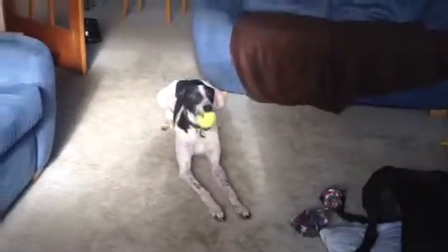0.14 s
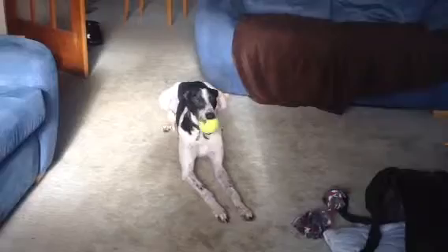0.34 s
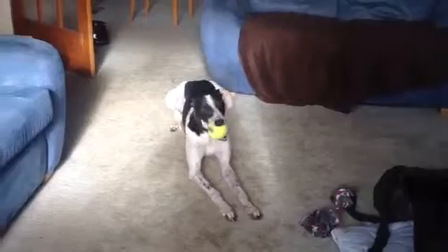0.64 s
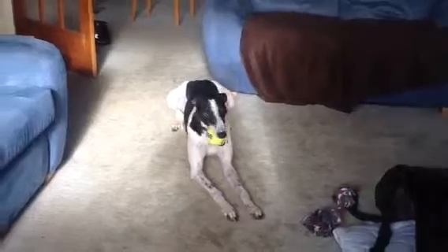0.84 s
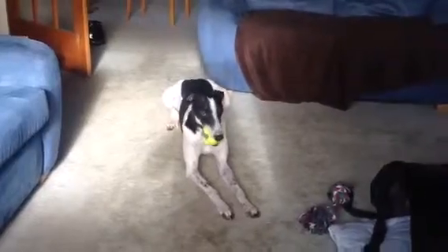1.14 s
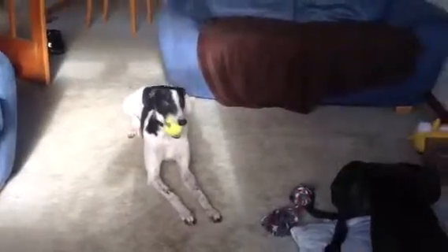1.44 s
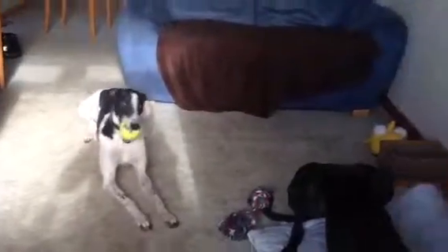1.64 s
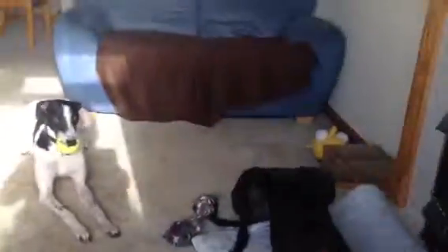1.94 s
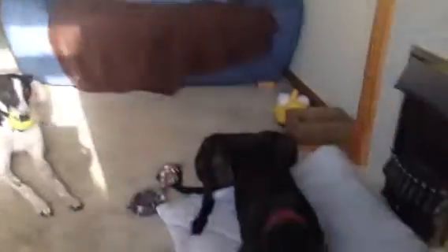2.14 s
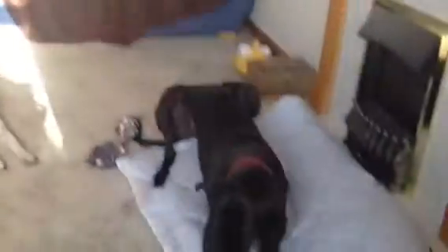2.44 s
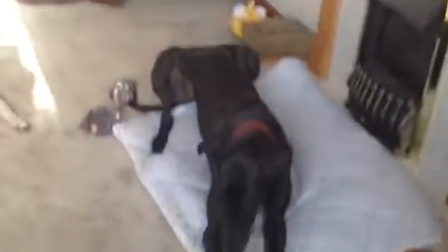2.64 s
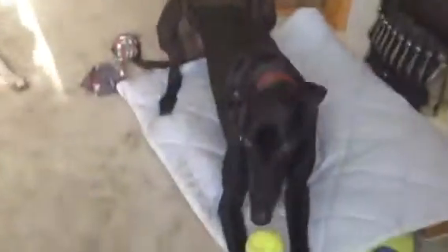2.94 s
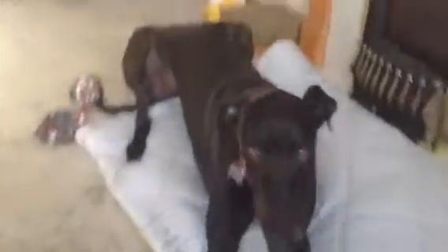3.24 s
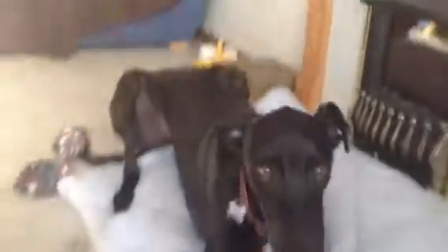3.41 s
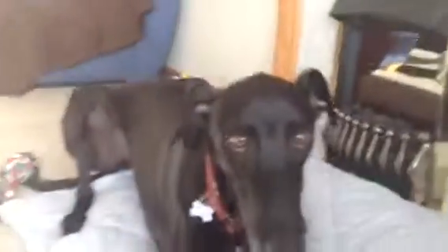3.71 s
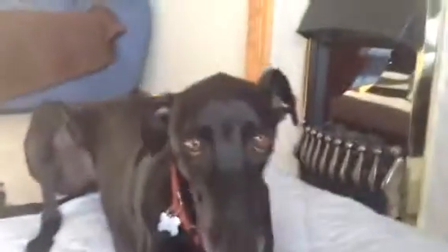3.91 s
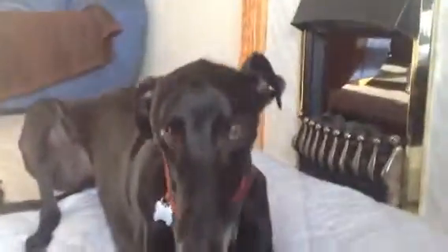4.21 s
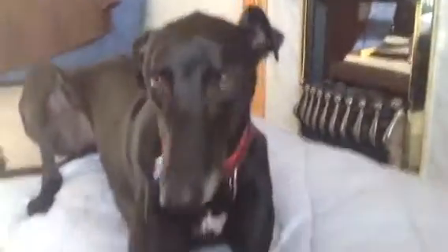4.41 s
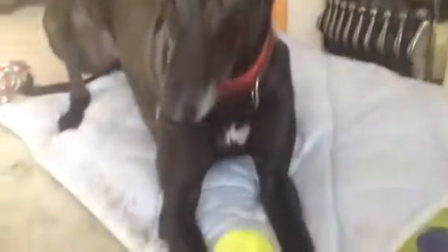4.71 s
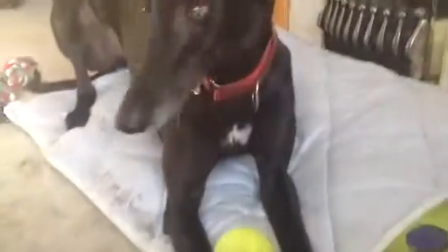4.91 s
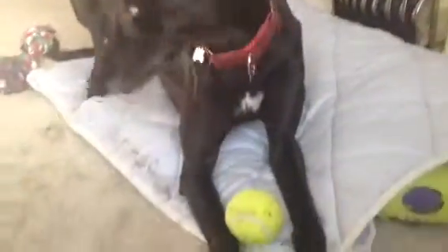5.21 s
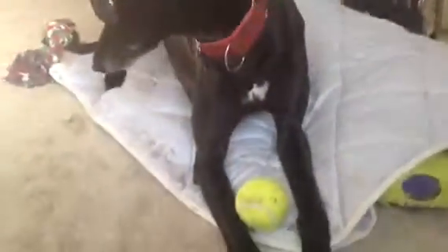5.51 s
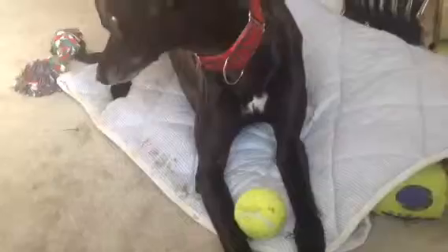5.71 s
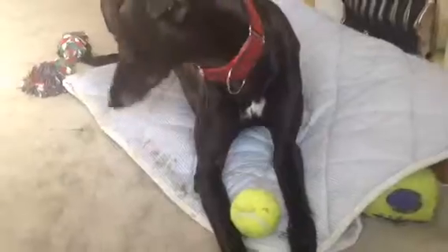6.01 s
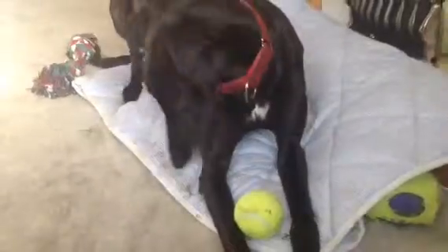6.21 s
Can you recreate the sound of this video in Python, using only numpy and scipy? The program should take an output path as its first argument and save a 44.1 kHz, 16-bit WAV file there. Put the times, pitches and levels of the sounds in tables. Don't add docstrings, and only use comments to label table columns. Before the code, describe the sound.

A small carpeted room with soft hum and faint microphone hiss; the tail of an earlier squeak dies away at the start. At 0.4 s a dog's bite makes a short falling yelp from a rubber ball, with a brief answering squeak as it refills. At 1.0 s a strong rising squeak is followed by a long, uneven, slightly croaky swell until 1.35. A quick rising pair comes at 1.95, softer. A sharp handling knock at 2.7 leads into cloth scuffs as another dog shifts on a quilt, fading by 3.5. A faint low squeak and falling reply come at 3.5. Dry ticks cluster around 4.0 to 4.3. At 4.76 a squeak dips and climbs, then a long wavering refill lasts to 5.2. Dull bumps and rubs on the casing crowd 5.1 to 6.2, before the hardest, highest squeak at 6.2 to 6.3.

```python
import sys
import numpy as np
from scipy import signal
from scipy.fft import rfft, irfft
from scipy.io import wavfile

SR = 44100
rng = np.random.default_rng(int(sys.argv[2]) if len(sys.argv) > 2 else 0)


def ratio(d):
    e = np.asarray(d, float) / 20
    return 10 ** e


def pcm_store(signal):
    levels = np.round(np.clip(np.atleast_2d(signal), -1, 1) * 32767)
    wavfile.write(sys.argv[1], SR, levels.astype(np.int16).T)


N = 280035
RUN_IN = SR // 4

# start_s, pitch_hz, level_db
SQUEEZE_NOTES = [
    [(0.397, 1678, -32), (0.403, 1502, -33.5), (0.415, 1454, -21)],
    [(1.003, 1475, -28.5), (1.02, 1478, -25), (1.04, 1552, -20), (1.055, 1543, -21.5), (1.058, 1706, -22.5),
     (1.08, 1745, -19.5), (1.103, 1801, -26.5), (1.117, 1785, -20)],
    [(1.95, 1561, -31.5), (1.963, 1782, -25.5), (1.99, 1795, -25), (1.995, 1785, -28), (2.03, 1832, -24.5)],
    [(3.525, 1573, -30), (3.548, 1622, -30.5), (3.553, 1444, -25.5), (3.582, 1463, -30)],
    [(4.76, 1588, -33.5), (4.768, 1494, -29.5), (4.788, 1457, -29.5), (4.792, 1647, -31),
     (4.812, 1724, -27.5), (4.835, 1788, -24), (4.87, 1795, -20), (4.895, 1768, -25), (4.918, 1774, -19.5)],
]
# start_s, pitch_hz, level_db
HARD_BITE = [(6.197, 1553, -29.5), (6.245, 1784, -27.5), (6.27, 1780, -24.5), (6.273, 1917, -25),
             (6.29, 1874, -18), (6.293, 2120, -22.5), (6.308, 2146, -19), (6.324, 2058, -18),
             (6.327, 1489, -24.5)]
# start_s, pitch_hz, level_db
RELEASE_NOTES = [
    [(0.462, 1441, -32), (0.487, 1489, -35), (0.495, 1504, -19.5), (0.515, 1450, -25.5), (0.54, 1374, -36)],
    [(1.146, 1417, -32.5), (1.16, 1556, -24.5), (1.175, 1650, -32.5), (1.195, 1650, -21),
     (1.248, 1647, -21), (1.27, 1537, -28), (1.29, 1541, -23.5), (1.325, 1489, -23)],
    [(2.064, 1442, -37), (2.074, 1546, -27), (2.085, 1656, -36.5), (2.118, 1642, -27), (2.165, 1488, -30.5),
     (2.205, 1434, -35.5)],
    [(3.614, 1508, -21.5), (3.623, 1626, -34), (3.645, 1555, -29), (3.67, 1475, -31.5),
     (3.705, 1434, -36.5)],
]
# start_s, pitch_hz, level_db
LONG_RELEASE = [(4.961, 1496, -24), (4.972, 1536, -25.5), (4.99, 1598, -22), (5.04, 1565, -26),
                (5.09, 1526, -24.5), (5.122, 1570, -29), (5.148, 1641, -22.5), (5.17, 1524, -31),
                (5.195, 1459, -28.5)]
# start_s, pitch_hz, level_db
EARLIER_RELEASE = [(-.16, 1520, -16), (-.1, 1441, -32.5)]
# frequency_hz, level_db
SQUEEZE_COLOUR = [(820, -31.5), (1400, -15.5), (2320, -20), (2920, 2), (3430, -4), (4030, -3), (4920, -7.5),
                  (7290, -7), (9860, -10), (10900, -12), (15500, -31)]
# frequency_hz, level_db
RELEASE_COLOUR = [(820, -18), (1400, -16.5), (2270, -8), (3190, 3.5), (3870, -3.5), (4540, -8.5),
                  (5390, -11.5), (6530, -13), (8480, -32.5), (10300, -13.5), (15500, -24)]
# partial1_db, partial2_db, partial3_db, brightness_db_per_octave, stall_s
SQUEEZE_GRIP = [(5, 2, 1, 5.5, 0.025), (-4.5, -3.5, 1, 1.5, 0.021), (1, 6, 3.5, 1.5, 0.028),
                (-2, 4, 0.5, 3.5, 0.0204), (-6.5, -8.5, -3.5, 1.5, 0.027), (7.5, 3.5, 1.5, 7, 0.019)]
RELEASE_GRIP = [(2, 1.4, -0.5, 4, .025), (-0.5, 0.58, 0.5, 3.7, .035), (5.5, 3.7, 5.5, 6.2, 0.0335),
                (-1, 2.1, 3, 4.5, 0.029), (-3.5, 2.8, 4, 4.1, .043), (-2, 1.1, -0.5, 6, 0.0463)]
SQUEEZE_ROUGH = [.16, .14, .08, .06, .04, .12]
RELEASE_ROUGH = [.1, .22, .2, .06, .05, .1]
# lead_s, below_first_note_db, dulling_db_per_octave, extra_roughness_0_to_1, settling_s
BITE_START = (.006, 24, 8.8, 0.11, 0.0088)
SWELL_START = (.005, 14, 3, 0.28, 0.017)
# pitch_hz, fall_share_at_half_time, fade_db, dulling_db_per_octave, roughness_0_to_1
BITE_END = (1310, .7, 14, 2.5, 0.92)
SWELL_END = (1330, .55, 14.5, 3.2, .5)
# time_s, half_pitch_level_db
HALF_PITCH = [(1.17, -50), (1.2, -8), (1.25, -10), (1.3, -41.5)]
# squeak_s, lead_s, level_db
AIR_LEAK = [
    (0.391, 0.14, -56),
    (.996, 0.11, -55.5),
    (1.942, 0.063, -61),
    (3.517, .04, -63),
    (4.754, .06, -60),
    (6.19, 0.068, -64.5),
]
# start_s, peak_db, ring_hz, rattle_db
KNOCKS = [(0.247, -40.5, 230, -38), (0.397, -37.5, 282, -12), (0.488, -40.5, 190, -26),
          (1.752, -39.5, 303, -31), (2.261, -33.5, 576, -19), (2.367, -45, 284, -18),
          (2.455, -34.5, 1060, -10.5), (2.682, -12, 985, -26.5), (2.724, -26, 560, -44),
          (2.987, -36.5, 160, -17), (3.923, -35.5, 230, -9), (4.235, -37.5, 212, -4),
          (4.642, -47.5, 330, -7), (4.708, -43, 1330, -16), (4.902, -43.5, 245, -32),
          (4.949, -41.5, 196, -36), (5.093, -48, 196, -18), (5.13, -25, 287, -11.5),
          (5.202, -20.5, 1030, -14.5), (5.211, -18.5, 1040, -19.5), (5.232, -32.5, 270, -13),
          (5.332, -24, 515, -25), (5.403, -26.5, 452, -19.5), (5.57, -45.5, 290, -21),
          (5.668, -24.5, 472, -22.5), (5.82, -38.5, 259, -10), (5.879, -16.5, 784, -29.5),
          (6.005, -21.5, 485, -28), (6.212, -14.5, 930, -37)]
# start_s, length_s, level_db, bottom_hz, top_hz
RUBS = [(.245, 0.027, -64, 151, 398), (2.45, 0.015, -48.5, 600, 3880), (2.494, 0.026, -69.5, 410, 3430),
        (2.679, 0.013, -33, 800, 6060), (2.883, 0.015, -54, 1000, 5860), (3.923, 0.0053, -39.5, 300, 4770),
        (4.202, 0.054, -58, 610, 1190), (4.215, 0.0069, -61, 2020, 7000), (4.236, 0.0039, -40.5, 307, 5660),
        (4.397, 0.0097, -58.5, 1480, 4660), (4.476, 0.013, -57, 795, 4400), (4.486, 0.029, -66, 3040, 9000),
        (4.582, 0.0072, -56, 1010, 5300), (4.707, 0.0096, -55, 500, 3970), (5.13, 0.064, -44, 200, 1070),
        (5.203, .018, -52, 297, 1650), (5.677, 0.049, -59.5, 302, 1610), (6.013, .025, -58.5, 495, 1500),
        (0.621, 0.065, -62, 2500, 5030), (0.724, 0.017, -60, 600, 1290)]
# start_s, peak_db, resonance_hz
TICKS = [(0.182, -73, 3600), (1.5848, -46.5, 2980), (1.6594, -46, 3900), (1.834, -35.5, 1500),
         (2.9025, -33.5, 1680), (3.156, -39.5, 1570), (4.0018, -34, 9270), (4.032, -39, 3400),
         (4.051, -45, 3270), (4.093, -39, 4570), (4.171, -59, 4120), (4.334, -45.5, 2980),
         (4.6474, -52, 1990), (5.407, -40.5, 4500), (5.4843, -40, 2020), (5.5328, -45, 4380)]
# centre_s, level_db, half_length_s
RUSTLE = [
    (2.496, -54.5, 0.021),
    (3.04, -55.5, .012),
    (2.806, -57.5, 0.14),
    (2.89, -50, 0.027),
    (2.976, -47.5, 0.042),
    (3.197, -63, 0.16),
    (3.3, -64, 0.26),
]
# frequency_hz, density_db
RUSTLE_COLOUR = [(120, 0.5), (250, 0), (600, -3), (1500, -6.5), (4500, -13.5), (8000, -30), (14000, -33)]
# frequency_hz, density_db
HUM_COLOUR = [(59, -56), (100, -13.5), (313, -4.5), (429, -13), (808, -16.5), (977, -14.5), (1290, -19.5),
              (2870, -27.5), (3540, -24), (14200, -32), (15500, -36)]
# time_s, level_db
HUM_LEVEL = [(0.0, -60.5), (0.99, -63), (1.7, -59.5), (2.92, -57.5), (3.13, -61), (3.54, -57.5),
             (4.42, -65.5), (5.36, -62.5), (5.46, -66), (6.35, -65.5)]
# frequency_hz, t60_s
ROOM_T60 = [(500, 0.77), (3000, 0.39), (6000, 0.41), (12000, 0.083)]


def rms_one(x):
    return x / np.sqrt(np.mean(x ** 2) + 1e-20)


def at_hz(points, hz):
    points_hz, points_db = np.transpose(points)
    return np.interp(np.log(hz), np.log(points_hz), points_db)


def drift(rate_hz, size):
    pole = np.exp(-2 * np.pi * rate_hz / SR)
    noise = rng.standard_normal(size + SR)
    return rms_one(signal.lfilter([1], [1, -2 * pole, pole * pole], noise)[SR:])


def coloured(spectrum):
    hz = np.maximum(np.arange(N // 2 + 1) * SR / N, 1)
    return rms_one(irfft(rfft(rng.standard_normal(N)) * ratio(at_hz(spectrum, hz)), N))


def filtered(x, order, hz, kind):
    return signal.sosfilt(signal.butter(order, hz, kind, fs=SR, output="sos"), x)


def dull(x, top_hz):
    return rms_one(signal.lfilter(*signal.butter(2, top_hz, fs=SR), x))


def add(out, start_s, sound):
    i = round(start_s * SR)
    out[i:i + len(sound)] += sound[:len(out) - i]


def reed(notes, grips, roughs, colour, start, end, sag_db, flutter_db, wobble, breathy_db):
    size = N + RUN_IN
    out, shake, air = np.zeros(size), drift(260, size), rng.standard_normal(size)
    flutter = np.array([drift(42, size) for _ in range(4)])
    order = np.arange(1, 24)[:, None] / 2
    flutter_row = np.arange(len(order)) // 2 % 4
    for rows, (*grip_db, bright, stall_s), steady in zip(notes, grips, roughs):
        s, *columns = stroke(rows, bright, stall_s, steady, start, end, sag_db)
        at = np.arange(round(s[0] * SR), round(s[-1] * SR) + 40)
        at = at[at < N]
        slot = at + RUN_IN
        hz, level_db, tilt, rough = [np.interp(at / SR, s, c) for c in columns]
        rough = np.clip(rough, 0, 1)
        phase = 2 * np.pi * np.cumsum(hz * (1 + wobble * rough * shake[slot])) / SR

        partial_hz = order * hz
        gain_db = at_hz(colour, np.maximum(partial_hz, hz)) + tilt * np.log2(partial_hz / 3000)
        gain = ratio(gain_db) * (partial_hz < 16000)
        half_db = np.interp(at / SR, *np.transpose(HALF_PITCH))
        gain[::2] *= ratio(half_db - 5.0 * np.log2(2 * order[::2]))
        gain[1:6:2] *= ratio(grip_db)[:, None]
        gain /= np.sqrt(np.sum(gain ** 2, axis=0) / 2)
        gain *= ratio(flutter_db * flutter[flutter_row][:, slot])

        tone = np.sum(gain * np.cos(order * phase + order ** 2 * 0.53), axis=0)
        tone *= 1 + ratio(breathy_db) * rough * air[slot]
        edge = np.minimum(1, np.minimum(at - at[0], (at[-1] - at) / 5.0) / 60)
        out[slot] += tone * edge * ratio(level_db - 2.0)
    return filtered(out, 4, 650, "high")


def stroke(rows, bright, stall_s, rough, start, end, sag_db):
    lead_s, lead_db, lead_dull, lead_rough, settle_s = start
    stall_hz, share, fade_db, end_dull, end_rough = end
    s, hz, db = np.transpose(rows)
    s = np.r_[s[0] - lead_s, s]
    db = np.r_[db[0] - lead_db, db]
    hz = np.r_[1.06 * hz[0], hz]
    young = np.exp(-(s - s[0]) / settle_s)
    tilt = bright - sag_db * (hz.max() - hz) / np.ptp(hz) - lead_dull * young
    half, fall = np.array([.5, 1]), np.array([share, 1])
    return (np.r_[s, s[-1] + stall_s * half],
            np.r_[hz, hz[-1] + (stall_hz - hz[-1]) * fall],
            np.r_[db, db[-1] - fade_db * half],
            np.r_[tilt, tilt[-1] - end_dull * half],
            np.r_[rough + lead_rough * young, rough + (end_rough - rough) * fall])


def squeaky_ball():
    bites = reed(SQUEEZE_NOTES + [HARD_BITE], SQUEEZE_GRIP, SQUEEZE_ROUGH, SQUEEZE_COLOUR, BITE_START, BITE_END,
                 sag_db=1.5, flutter_db=3.5, wobble=0.066, breathy_db=-20.0)
    swells = reed(RELEASE_NOTES + [LONG_RELEASE, EARLIER_RELEASE], RELEASE_GRIP, RELEASE_ROUGH, RELEASE_COLOUR,
                  SWELL_START, SWELL_END, sag_db=5.5, flutter_db=2.5, wobble=0.027, breathy_db=-21.0)
    return bites + swells


def air_leak():
    t, swell = np.arange(N) / SR, np.zeros(N)
    for s, lead_s, level_db in AIR_LEAK:
        swell += ratio(level_db) * np.interp(t, [s - lead_s, s - lead_s / 2, s, s + .02], [0, 0.41, 0.69, 0])
    return swell * coloured([(4000, -40), (8000, 8.0), (10500, 9.0), (15000, 2)])


def room(x):
    t = np.arange(int(.8 * SR)) / SR
    early_t60_s, late_db, first_echo_s, room_db = 0.23, -11, 0.0008, -5.5
    tail, edges_hz = np.zeros(len(t)), 250 * 2 ** np.arange(0, 6.5, .5)
    for low, high in zip(edges_hz, edges_hz[1:]):
        band = filtered(rng.standard_normal(len(t)), 2, [low, high], "band")
        late = ratio(late_db - 60 * t / at_hz(ROOM_T60, np.sqrt(low * high)))
        tail += band * (ratio(-60 * t / early_t60_s) + late)
    tail *= np.clip((t - first_echo_s) / 0.012, 0, 1)
    return ratio(room_db) * signal.fftconvolve(x, tail / np.sqrt(np.sum(tail ** 2)))[:len(x)]


def knocks():
    out, t = np.zeros(N), np.arange(2000) / SR
    rattle_s = .0105
    for s, peak_db, hz, rattle_db in KNOCKS:
        t60_s = .002 + 1.9 / hz
        thump = np.sin(2 * np.pi * hz * t * (1 - 12 * t))
        thump *= ratio(-60 * t / t60_s) * np.minimum(1, t * hz * 3.4)
        noise = dull(rng.standard_normal(len(t)), 1.8 * hz)
        rattle = ratio(rattle_db) * noise * np.exp(-(t / rattle_s) ** 2)
        add(out, s, ratio(peak_db + 3.0) * (thump / np.abs(thump).max() + rattle))
    return out


def rubs():
    out = np.zeros(N)
    for s, length_s, level_db, bottom_hz, top_hz in RUBS:
        size = round(length_s * SR)
        lumps = ratio(1.27 * drift(135, size)) * signal.windows.tukey(size, .4)
        noise = filtered(rng.standard_normal(4000), 1, bottom_hz, "high")
        add(out, s, ratio(level_db) * lumps * dull(noise, top_hz)[-size:])
    return out


def hand_creak():
    size_db = -56.5 + 5.25 * np.minimum(rng.exponential(1, N), 3)
    bumps = ratio(size_db) * rng.choice([-1, 1], N) * (rng.random(N) < 22 / SR)
    return filtered(30 * bumps, 2, [160, 520], "band")


def ticks():
    out, t = np.zeros(N), np.arange(1200) / SR
    t60_s = 0.012
    for s, peak_db, hz in TICKS:
        hit = rng.standard_normal(len(t))
        hit[0] = 5.1
        burst = filtered(hit * ratio(-60 * t / t60_s), 1, [hz * .7, hz * 1.3], "band")
        add(out, s, ratio(peak_db) * burst / np.abs(burst).max())
    return out


def quilt():
    t, power = np.arange(N) / SR, np.zeros(N)
    for s, level_db, width_s in RUSTLE:
        power += ratio(2 * level_db) * np.exp(-2 * ((t - s) / width_s) ** 2)
    clumps = ratio(2.5 * drift(60, N))
    return np.sqrt(power) * clumps * coloured(RUSTLE_COLOUR)


def hum():
    noise = ratio(-60) * coloured(HUM_COLOUR)
    bass = signal.sosfiltfilt(signal.butter(1, 900, fs=SR, output="sos"), noise)
    flicker = ratio(1.3 * drift(12, N))
    level_db = np.interp(np.arange(N) / SR, *np.transpose(HUM_LEVEL))
    return noise - bass + bass * flicker * ratio(level_db + 62.0)


def scene():
    ball, small = squeaky_ball(), ticks()
    far = np.concatenate([np.zeros(RUN_IN), ratio(-6.5) * small])
    wet_ball = (ball + room(ball + far))[RUN_IN:]
    handling = knocks() + rubs() + hand_creak()
    return (wet_ball + air_leak() + small + handling + quilt() + hum())[None]


def band_limit(x):
    return signal.sosfilt(signal.butter(12, 15830, fs=SR, output="sos"), x)


def record(dry):
    port_hz, top_hz, circuit_db = 139, 15450, -86
    heard = filtered(dry, 4, port_hz, "high")
    murmur = dull(filtered(rng.standard_normal(N), 2, 70, "high"), 110)
    heard = heard + ratio(circuit_db) * murmur
    mix = signal.sosfilt(signal.ellip(8, .5, 60, top_hz, fs=SR, output="sos"), heard)
    return band_limit(mix)


dry = scene()
out = record(dry)
pcm_store(out)
```